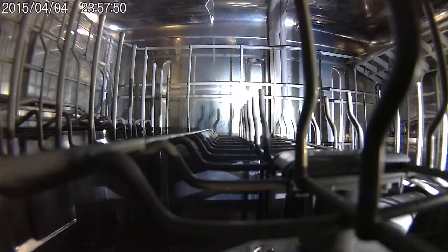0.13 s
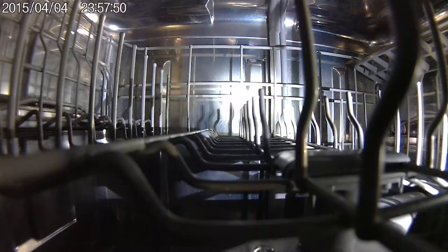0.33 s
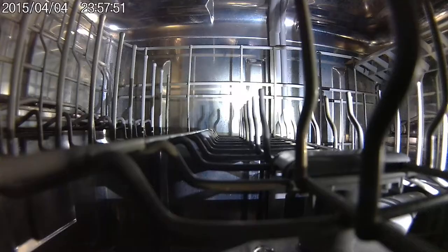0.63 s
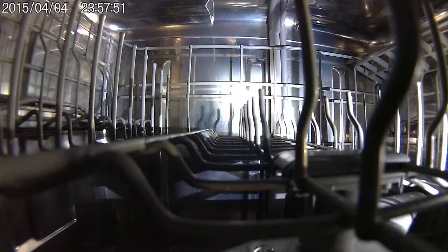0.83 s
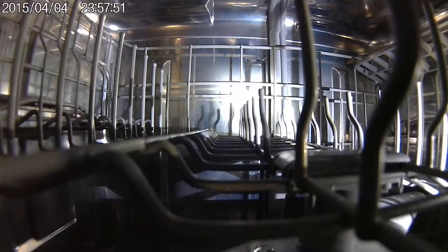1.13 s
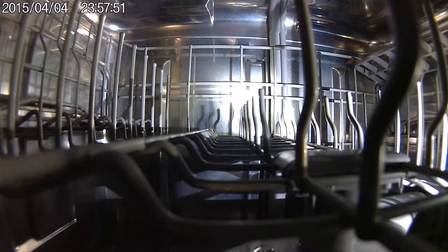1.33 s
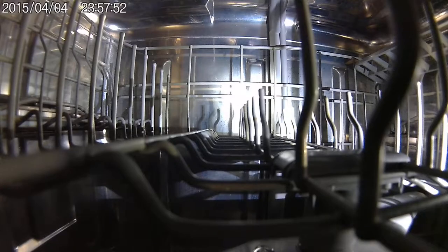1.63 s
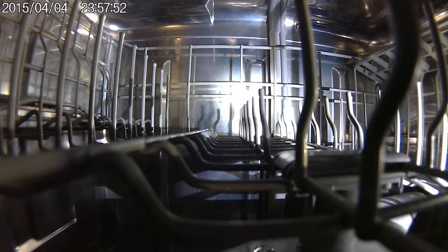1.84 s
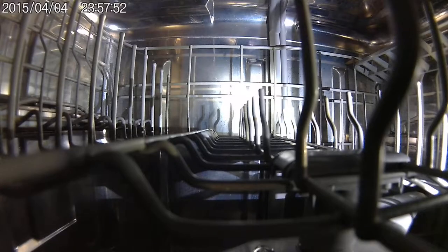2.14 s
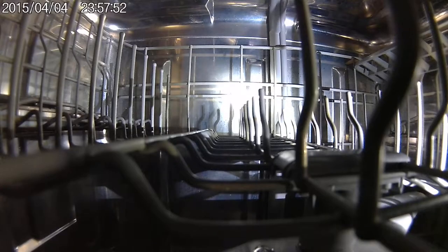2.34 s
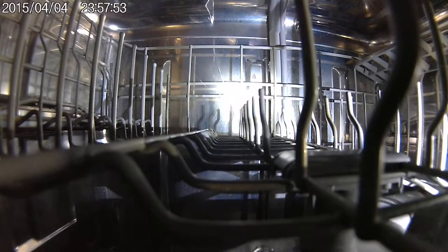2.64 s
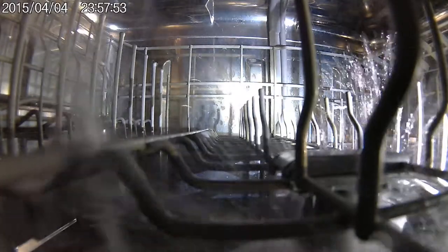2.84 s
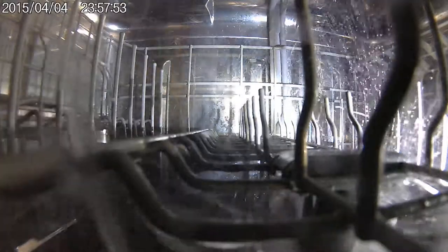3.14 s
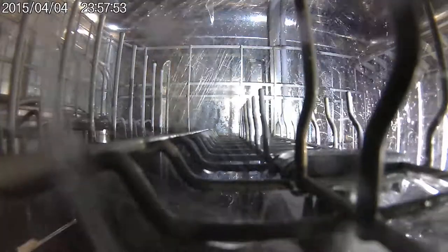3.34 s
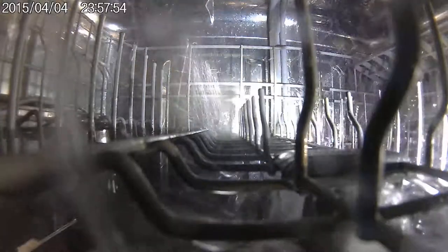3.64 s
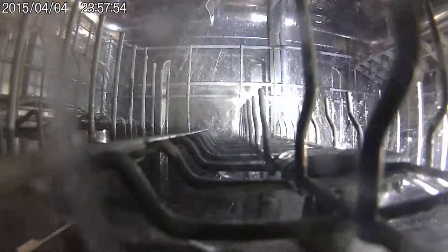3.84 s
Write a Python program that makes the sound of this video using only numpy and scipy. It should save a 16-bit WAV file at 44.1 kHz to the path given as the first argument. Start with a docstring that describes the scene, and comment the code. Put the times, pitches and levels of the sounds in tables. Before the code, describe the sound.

Water sprays inside a dishwasher, heard close up from the rack. First a quiet trickle drips and gurgles, then the pump hums and hissing jets lash the racks and hollow steel tub, easing into churning splashes.

```python
"""Water jets lash the racks inside a steel dishwasher tub, close up, then fade as the arm swings away.
First a quiet inflow trickles, drips and gurgles; then the pump hums and shakes, air gulps out of the
pipe, the sump churns and the nozzles spit. The water is droplet clicks and shaped noise, the bubbles
are short dying tones, and the tub's air modes and echo give them a hollow, steely ring.
The wash plays on the left channel; the right holds only a faint hiss."""
import sys
import numpy as np
from scipy import signal
from scipy.fft import rfft, irfft
from scipy.io import wavfile

SR = 44100
rng = np.random.default_rng(int(sys.argv[2]) if len(sys.argv) > 2 else 0)


def store_wav(level_fs):
    """Save 16-bit WAV to argv[1]."""
    pcm = np.round(np.clip(np.atleast_2d(level_fs), -1, 1) * 32767)
    wavfile.write(sys.argv[1], SR, pcm.T.astype(np.int16))


N = 176400
TIME = np.arange(N) / SR

# Air modes of the tub: pitch_hz, inflow_lift_db (also for bubbles), wash_lift_db (pumped water)
TUB_MODES = [(265.7, 11.5, 6), (324, 2.5, 2), (423.3, 12.5, 7), (521.5, 13, 4.5), (638.3, 10, 10.5),
             (695.8, 8, 4.5), (767, -14, 8.5), (825, 4.5, 4.5), (970.7, 12.5, 9.5), (1004, 8.5, 9),
             (1064, 6, 2), (1144, 6, -19), (1186, 10, -6), (1199.4, -12, 12), (1243, 14, -6),
             (1348, -10, 8), (1388, 14, -2.5), (1505, -22, 7.5), (1608, 9, -2), (1895, 6, -26),
             (2004, 9, -7), (2000, -27, 8)]
# EQ of the thin inflow: frequency_hz, gain_db
INFLOW_EQ = [(25, 0.5), (55, 4), (120, -0.5), (190, -7.5), (260, -7.5), (560, -11.5), (660, 4.5),
             (790, -7.5), (1300, -3), (1900, -6.5), (2400, -13.5), (3800, -15), (5600, -15), (6700, -10),
             (7700, -22.5), (9600, -17), (12000, -20), (15500, -31.5)]
# Stray drops off the racks: rate_per_s, low_hz, high_hz, echo_level_db
DRIPS = (74, 1208, 14000, -56.5)
# Fat drops nearby: rate_per_s, low_hz, high_hz, level_db (relative to the churn)
SPLATS = (68, 1498, 7000, -17)
# Bubble clusters: start_s, pitch_hz, level_db (before trim and tub), spread_octaves
GURGLES = [(.075, 2700, -51, .3), (0.127, 4060, -50.5, 0.55), (0.259, 2100, -46, 0.14),
           (.333, 7960, -52, .12), (0.339, 1500, -43.5, 0.35), (.55, 2050, -50.5, 0.15),
           (0.694, 1490, -42, 0.2), (.715, 2520, -51, 0.19), (.73, 9900, -52, 0.68), (0.806, 4200, -56, .1),
           (.9, 2670, -55.5, 0.12), (1.032, 4480, -47.5, 0.058), (1.043, 3000, -43, 0.038),
           (1.241, 4300, -52, 0.42), (1.205, 11500, -58, .2), (1.372, 2600, -50.5, 0.62),
           (1.446, 1490, -46, 0.33), (1.757, 3000, -49, 0.084), (1.779, 1860, -39, 0.15),
           (1.815, 1290, -44.5, 0.2), (1.924, 9700, -50, 0.15), (1.997, 1990, -48.5, 0.079),
           (2.137, 1010, -34, 0.14), (2.544, 1140, -21, 0.28), (2.572, 1880, -20, 0.12),
           (2.678, 3400, -20.5, 0.2), (2.71, 11600, -18.5, 0.11), (2.862, 10800, -22.5, .15),
           (2.905, 3210, -23, 0.27), (3.255, 2740, -27.5, 0.17), (3.555, 6050, -32.5, .3),
           (3.654, 2930, -30, 0.1), (3.728, 1580, -31, 0.067), (3.879, 1015, -27.5, 0.17)]
# Envelope of the pump's shaking: time_s, level_db
PUMP_ENVELOPE = [(2.02, -67), (2.055, -34), (2.10, -25), (2.2, -39), (2.25, -31), (2.31, -28.5),
                 (2.38, -19.5), (2.42, -19), (2.46, -28.5), (2.58, -27), (2.65, -22), (2.84, -31.5),
                 (2.97, -24.5), (3.07, -30), (3.16, -23), (3.25, -28), (4.0, -27)]
# Envelope of the first rush up the feed pipe: time_s, level_db
SURGE_ENVELOPE = [(2.04, -45), (2.11, -40.5), (2.2, -35), (2.26, -26.5), (2.33, -23), (2.4, -20),
                  (2.46, -15), (2.55, -28.5), (3.2, -55)]
# EQ of that rush: frequency_hz, gain_db
SURGE_EQ = [(40, 0), (100, -0.5), (170, -11), (260, 2), (380, -17.5), (570, -15), (650, 0.5), (790, -3.5),
            (1000, -1.5), (1400, 1), (1900, -7.5), (2800, -12.5), (15000, -35)]
# Big air pockets booming through the pipe: start_s, pitch_hz, level_db, swell_s
GULPS = [(2.222, 647, -26.5, 0.043), (2.424, 262, -24.5, 0.024), (2.436, 620, -24.5, 0.059),
         (2.782, 634, -28, 0.045), (3.382, 269, -29, 0.056), (3.734, 270, -33, 0.028)]
# Envelope of the water churning in the sump: time_s, level_db
CHURN_ENVELOPE = [(2.2, -57), (2.3, -32), (2.39, -30.5), (2.45, -27), (2.51, -21), (2.58, -14),
                  (2.65, -22.5), (2.76, -19), (2.88, -21.5), (3.0, -22.5), (3.15, -22.5), (3.33, -25),
                  (3.45, -24.5), (3.6, -22.5), (3.72, -23.5), (4.0, -24)]
# EQ of the churn: frequency_hz, gain_db
CHURN_EQ = [(25, 5), (55, 5.5), (90, -4), (160, 2.5), (260, -2.5), (400, -4.5), (560, -6.5), (850, -3.5),
            (1300, -0.5), (1650, -3), (2100, -4.5), (2500, -8), (3100, -6.5), (3900, -36), (6600, -13.5),
            (8000, -19), (15000, -22.5)]
# Spitting nozzles: start_s, end_s, low_hz, high_hz, level_db
SPUTTER = (2.5, 3.5, 2300, 5510, -40)
# Close ticks, the sharp onset of one gurgle and then nearby drops: start_s, pitch_hz, peak_db
TICKS = [(1.782, 1850, -32), (3.395, 6750, -15), (3.468, 5240, -16.5), (3.4917, 5330, -18),
         (3.4955, 5300, -14.5), (3.4954, 8200, -11.5), (3.7008, 1390, -10), (3.7304, 1620, -11),
         (3.981, 5370, -14)]
# Envelope of the jets, striking close and then swinging away: time_s, level_db
JET_ENVELOPE = [(2.25, -62), (2.29, -50), (2.375, -33.5), (2.41, -15), (2.52, -13.5), (2.57, -16.5),
                (2.68, -16), (2.715, -16.5), (2.77, -17), (2.88, -14), (2.95, -16.5), (3.085, -16),
                (3.13, -21.5), (3.34, -26.5), (3.55, -26.5), (3.7, -31), (3.87, -30), (3.98, -24)]
# EQ of the jets: frequency_hz, gain_db
JET_EQ = [(400, -20), (1400, 6), (2050, 5), (2450, 0), (3100, 5.5), (3900, 0), (5600, 0), (6800, 0.5),
          (7900, -6), (9400, 2.5), (11800, 3.5), (13200, 0.5), (15500, -6)]

MODE_WIDTH_HZ, TUB_T60_S, TUB_WET_DB, DENSE_MODES_ABOVE_HZ = 9.4, 0.35, 1.5, 1240
INFLOW_DB, HISS_DB = -41.5, -68
GURGLE_S, GURGLE_TRIM_DB, RING_CYCLES = 0.016, 0.5, 1.37
BUBBLE_SHRINK_DB = 4.5   # later bubbles are smaller: this much quieter per GURGLE_S
PUMP_HZ, PUMP_WOBBLE, PUMP_THROB_DB, PUMP_START_S, PUMP_RISE_S = 53.7, 0.022, 1, 2.056, 0.087
HUM_HZ, HUM_IDLE_DB, HUM_LOAD_DB = 116.3, -57.5, -42.5
GULP_WIDTH_OCTAVES = 0.3
TICK_T60_S, TICK_RISE_S = 0.0071, 0.0002
LEAD_IN_S, CUTOFF_HZ = 0.072, 15720


def from_db(db):
    """Decibels to gain."""
    return np.exp(np.asarray(db) * (np.log(10) / 20))


def unit_rms(x):
    """Scale to rms 1."""
    return x / np.sqrt(np.mean(x ** 2) + 1e-20)


def envelope(points):
    """A fader ride through (time_s, level_db) points; silent before the first."""
    time_s, level_db = np.transpose(points)
    return from_db(np.interp(TIME, time_s, level_db, left=-np.inf))


def drift(rate_hz):
    """A smooth random modulator, about 1 rms."""
    hop, settle = 40, 2000
    pole = np.exp(-2 * np.pi * rate_hz * hop / SR)
    noise = rng.standard_normal(N // hop + settle + 2)
    slow = signal.lfilter([1], [1, -2 * pole, pole * pole], noise)[settle:]
    return np.interp(np.arange(N) / hop, np.arange(len(slow)), unit_rms(slow))


def patter(per_s, spread_db):
    """Random droplet clicks, many small and a few large; rms 1."""
    sizes = from_db(spread_db * np.minimum(rng.exponential(1, N), 4)) * rng.choice([-1, 1], N)
    return unit_rms(sizes * (rng.random(N) < per_s / SR))


def flickering_eq(x, eq, flicker_db, flicker_hz):
    """An EQ whose half-octave bands swell and sink, partly in step; rms 1."""
    hz, db = np.transpose(eq)
    octave = np.log2(np.maximum(np.fft.rfftfreq(N, 1 / SR), 1))
    spectrum = rfft(x) * from_db(np.interp(octave, np.log2(hz), db))
    together, out = drift(flicker_hz), 0
    for centre in np.arange(4.5, 14.6, .5):
        band = irfft(spectrum * np.maximum(1 - 2 * abs(octave - centre), 0), N)
        out = out + band * from_db(flicker_db * (0.81 * together + drift(flicker_hz)))
    return unit_rms(out)


def tub_modes(x, pumped):
    """Standing waves between the steel walls lift narrow bands, in another balance for pumped water."""
    radius, out = np.exp(-np.pi * MODE_WIDTH_HZ / SR), x
    feed = (1 - radius ** 2) / 2 * np.array([1, 0, -1])
    for hz, inflow_db, wash_db in TUB_MODES:
        ring = signal.lfilter(feed, [1, -2 * radius * np.cos(2 * np.pi * hz / SR), radius ** 2], x)
        out = out + from_db(wash_db if pumped else inflow_db) * ring
    return out


def tub_echo(x):
    """Dense reflections make a short reverb, fully wet."""
    t = TIME[:SR // 2]
    tail = rng.standard_normal(len(t)) * from_db(-60 * t / TUB_T60_S)
    return signal.fftconvolve(x, tail / np.linalg.norm(tail))[:N]


def steel_sheen(x, ring_db):
    """Higher up, the tub's modes crowd into a steely ripple: high-passed echo added to x."""
    highpass = signal.butter(2, DENSE_MODES_ABOVE_HZ, "high", fs=SR, output="sos")
    return x + from_db(ring_db) * signal.sosfilt(highpass, tub_echo(x))


def inflow():
    """The quiet bed: a thin stream patters into the sump."""
    trickle = patter(per_s=3000, spread_db=0.5) + from_db(4.5) * rng.standard_normal(N)
    stream = flickering_eq(trickle, INFLOW_EQ, flicker_db=1.5, flicker_hz=5.8)
    stream = steel_sheen(stream, ring_db=-10)
    return from_db(INFLOW_DB) * unit_rms(tub_modes(stream, pumped=False))


def stray_drops(per_s, low_hz, high_hz, db, pitch_count=16):
    """Lone drops at random, each a pitched tick a few cycles long."""
    out = 0
    for hz in np.geomspace(low_hz, high_hz, pitch_count):
        hits = rng.random(N) < per_s / pitch_count / SR
        clicks = hits * rng.uniform(-1.03, 1, N) ** 3 / np.sqrt(hz)
        radius, cosine = np.exp(-hz / SR / RING_CYCLES), np.cos(2 * np.pi * hz / SR)
        poles = [1, -2 * radius * cosine, radius ** 2]
        out = out + signal.lfilter([1, -radius * cosine], poles, clicks + 1e-18)
    return from_db(db) * unit_rms(out)


def drips():
    """Drops fall from the wet racks, mostly echo; once the wash runs, fat ones splat nearby."""
    dripping = stray_drops(*DRIPS)
    return from_db(-11) * dripping + tub_echo(dripping) + envelope(CHURN_ENVELOPE) * stray_drops(*SPLATS)


def gurgles(bubble_count=18):
    """Each gurgle is a dying cluster of bubbles around one pitch, echoing in the tub."""
    out, t = np.zeros(N + SR), TIME[:SR // 14]
    for start_s, hz, db, octaves in GURGLES:
        onsets_s = GURGLE_S * rng.exponential(1, (bubble_count, 1))
        onsets_s -= onsets_s.min()
        sizes = from_db(-BUBBLE_SHRINK_DB * onsets_s / GURGLE_S)
        pitches_hz = np.minimum(hz * 2 ** (octaves * rng.standard_normal((bubble_count, 1))), CUTOFF_HZ)
        cycles = np.maximum(t - onsets_s, 0) * pitches_hz
        bubbles = sizes * np.sin(2 * np.pi * cycles) * cycles * np.exp(-cycles / RING_CYCLES)
        out[int(start_s * SR):][:len(t)] += from_db(db + GURGLE_TRIM_DB) * unit_rms(bubbles.sum(0))
    wet = from_db(TUB_WET_DB)
    return (tub_modes(out[:N], pumped=False) + wet * tub_echo(out[:N])) / (1 + wet)


def pump():
    """The low end: the motor shakes the tub once a turn, and its windings hum louder under load."""
    turns = np.cumsum(PUMP_HZ * (1 + PUMP_WOBBLE * drift(4.7))) / SR
    shake = envelope(PUMP_ENVELOPE) * from_db(PUMP_THROB_DB * drift(10)) * np.sin(2 * np.pi * turns)
    hum_db = np.interp(TIME, [PUMP_START_S, PUMP_START_S + PUMP_RISE_S], [HUM_IDLE_DB, HUM_LOAD_DB])
    hum = from_db(hum_db) * np.sin(2 * np.pi * HUM_HZ * TIME)
    return np.sqrt(2) * (shake + hum)


def surge():
    """Water drives the air out of the pipe and arm with a hollow roar."""
    rush = flickering_eq(rng.standard_normal(N), SURGE_EQ, flicker_db=0.4, flicker_hz=15)
    return envelope(SURGE_ENVELOPE) * unit_rms(tub_modes(rush, pumped=True))


def gulps():
    """Each air pocket is a low whoosh that swells, fades and rings the tub's nearest modes."""
    out, t = np.zeros(N + SR), TIME[:SR // 2]
    for start_s, hz, db, swell_s in GULPS:
        edges_hz = hz * 2 ** (GULP_WIDTH_OCTAVES * np.array([-.5, .5]))
        band = signal.butter(2, edges_hz, "band", fs=SR, output="sos")
        whoosh = tub_modes(signal.sosfilt(band, rng.standard_normal(SR)), pumped=True)[-len(t):]
        swell = t / swell_s * np.exp(1 - t / swell_s)
        gulp = unit_rms(whoosh * swell) * np.sqrt(np.mean(swell ** 2))   # about 1 rms at the crest
        out[int(start_s * SR):][:len(t)] += from_db(db) * gulp
    return out[:N]


def churn():
    """The body of the wash: heavy water slaps the sump and walls and sets the tub ringing."""
    slaps = patter(per_s=4000, spread_db=3.5) + from_db(-3) * rng.standard_normal(N)
    water = flickering_eq(slaps, CHURN_EQ, flicker_db=1.73, flicker_hz=21.3)
    water = steel_sheen(water, ring_db=-6.5)
    return envelope(CHURN_ENVELOPE) * unit_rms(tub_modes(water, pumped=True))


def sputter(start_s, end_s, low_hz, high_hz, db):
    """Air and water spit from the nozzles: a hard-gated crackle under the jets."""
    band = signal.butter(2, [low_hz, high_hz], "band", fs=SR, output="sos")
    spit = signal.sosfilt(band, patter(per_s=9000, spread_db=13))
    return from_db(db) * unit_rms(spit) * (TIME >= start_s) * (TIME < end_s)


def ticks():
    """Short, dry, close ticks: nearby drops and the sharp onset of one gurgle."""
    out, t = np.zeros(N + SR), TIME[:SR // 20]
    shape = (1 - np.exp(-t / TICK_RISE_S)) * from_db(-60 * t / TICK_T60_S)
    shape /= shape.max()
    for start_s, hz, db in TICKS:
        out[int(start_s * SR):][:len(t)] += from_db(db) * shape * np.sin(2 * np.pi * hz * t)
    return out[:N]


def jets():
    """The bright lead: fine, fast droplets hit racks and steel over the smooth hiss of the jets."""
    spray = patter(per_s=9000, spread_db=0.5) + from_db(1.5) * rng.standard_normal(N)
    spray = steel_sheen(spray, ring_db=-9)
    return envelope(JET_ENVELOPE) * flickering_eq(spray, JET_EQ, flicker_db=1.5, flicker_hz=10)


def scene():
    """The mix as heard from the lower rack, panned hard left."""
    bed = inflow() + gurgles() + drips()
    wash = pump() + surge() + sputter(*SPUTTER) + gulps() + churn() + jets()
    return np.array([bed + wash + ticks(), np.zeros(N)])


def record(dry):
    """Faint hiss on both channels, a silent lead-in and a steep top cut."""
    hiss = from_db(HISS_DB) * rng.standard_normal((2, N))
    top_cut = signal.ellip(12, .1, 80, CUTOFF_HZ, fs=SR, output="sos")
    return signal.sosfilt(top_cut, (dry + hiss) * (TIME >= LEAD_IN_S))


dry = scene()
out = record(dry)
store_wav(out)
```